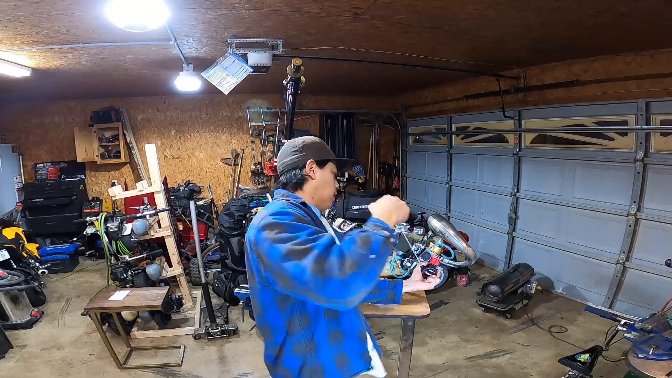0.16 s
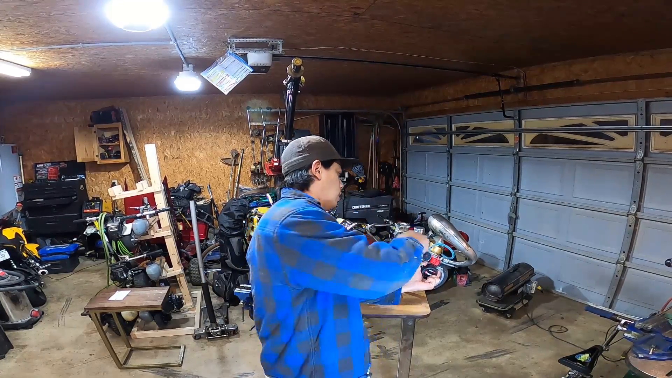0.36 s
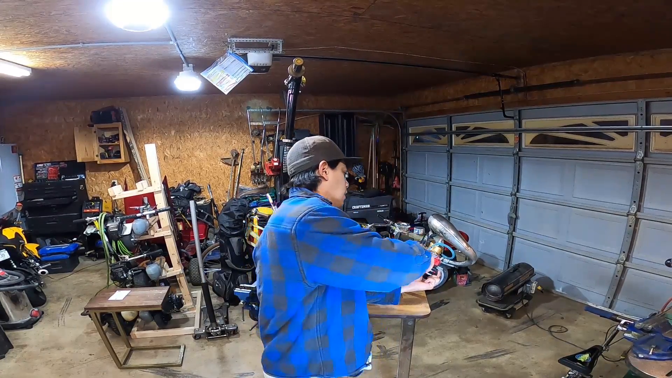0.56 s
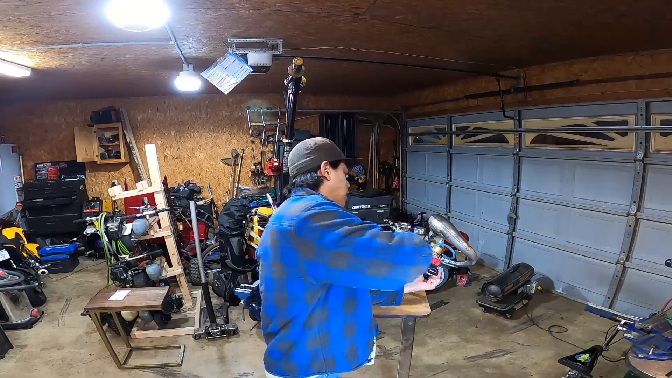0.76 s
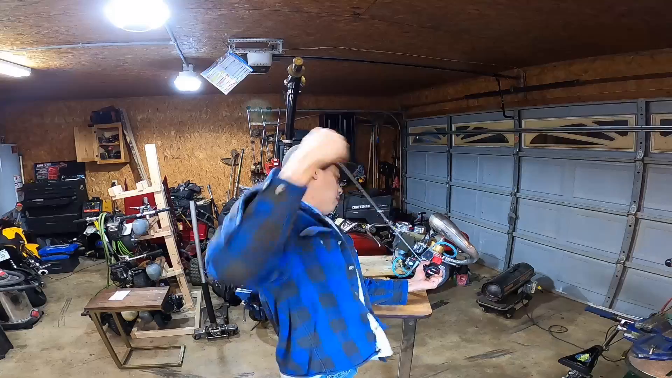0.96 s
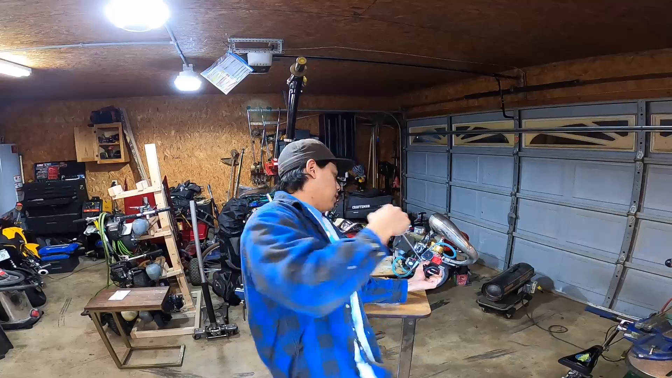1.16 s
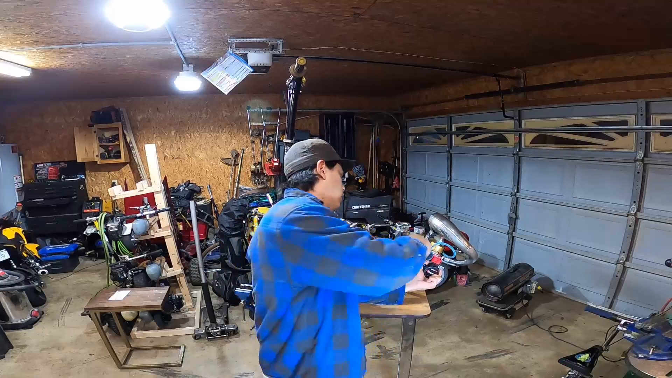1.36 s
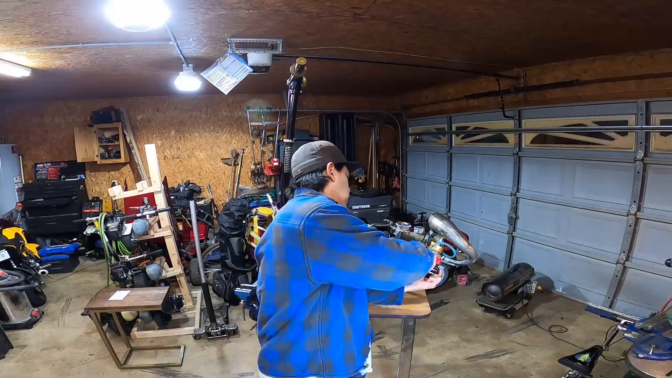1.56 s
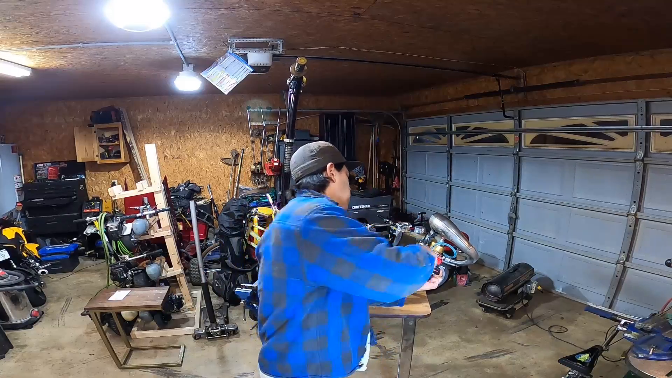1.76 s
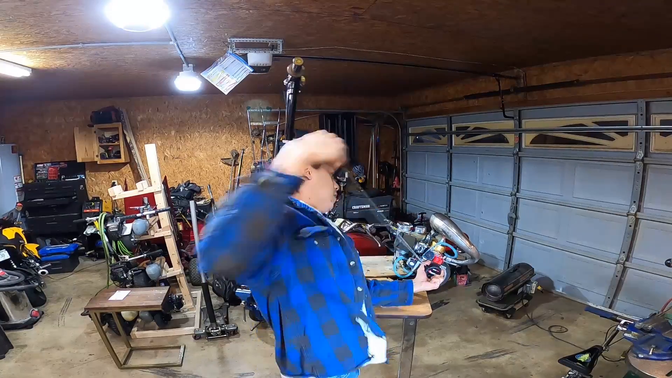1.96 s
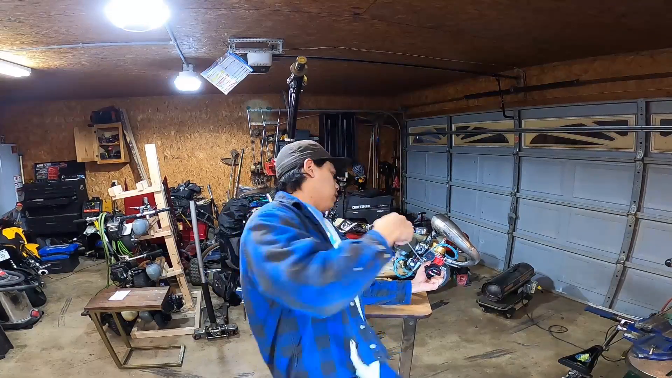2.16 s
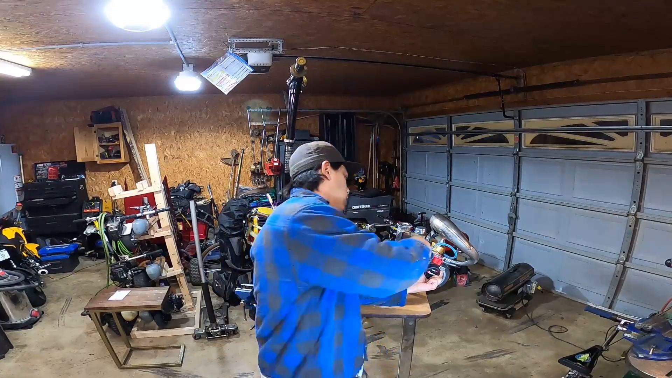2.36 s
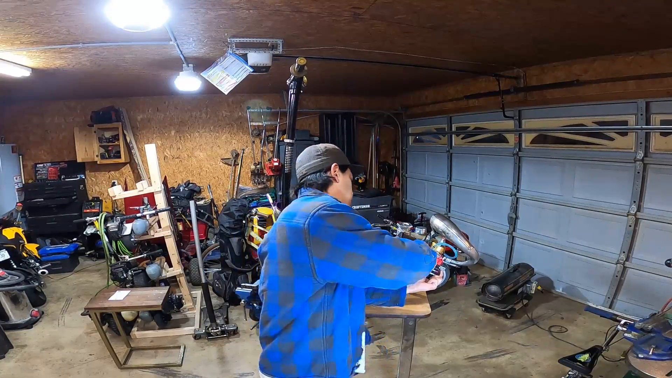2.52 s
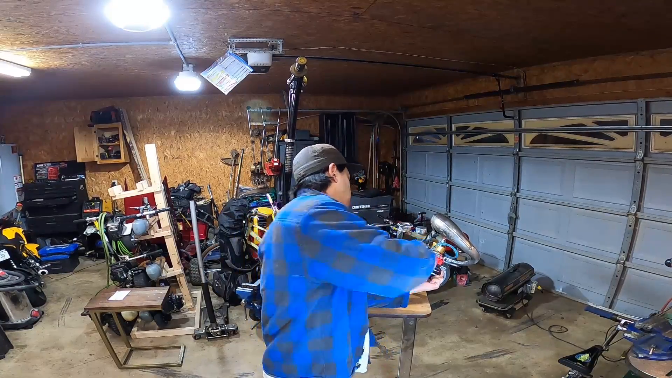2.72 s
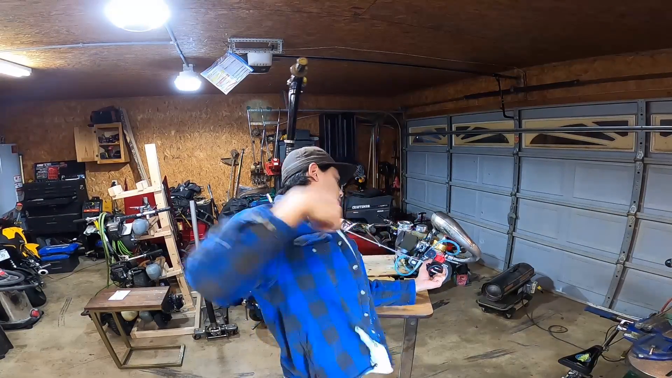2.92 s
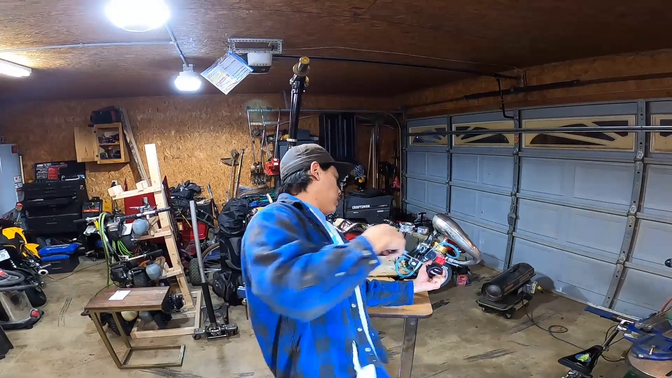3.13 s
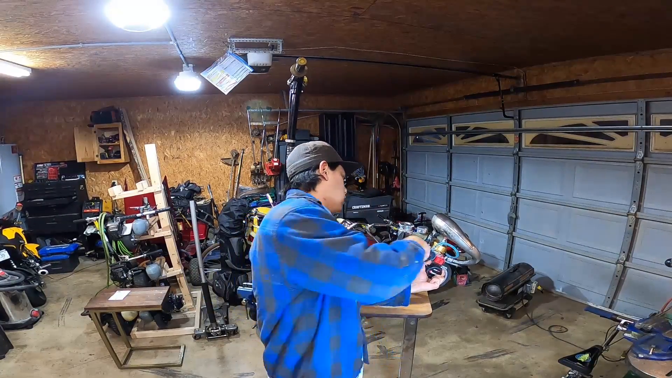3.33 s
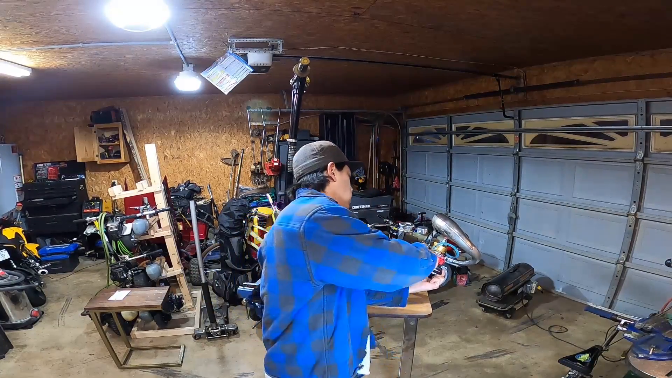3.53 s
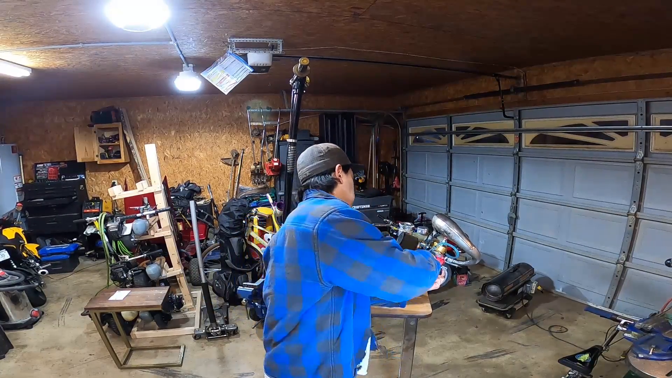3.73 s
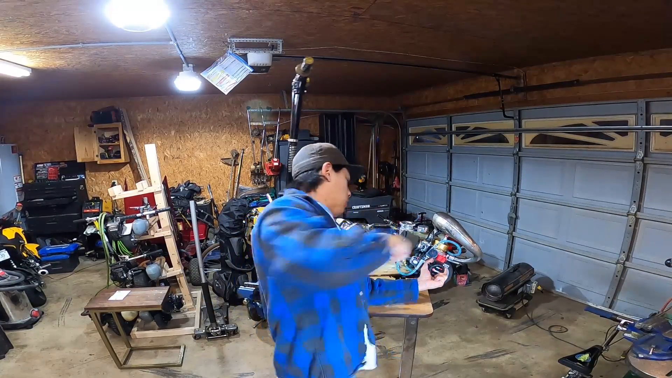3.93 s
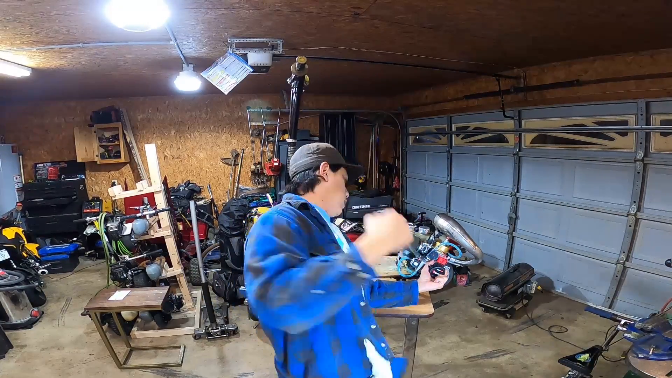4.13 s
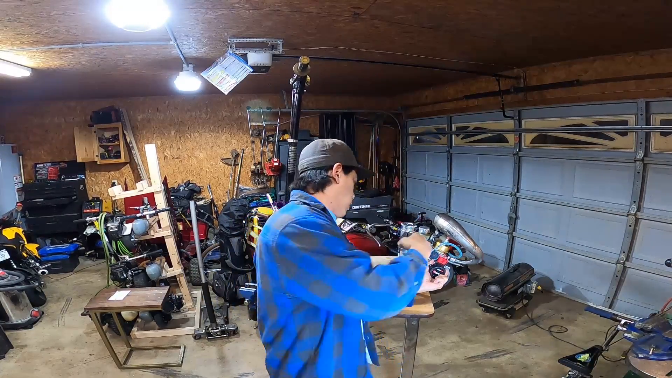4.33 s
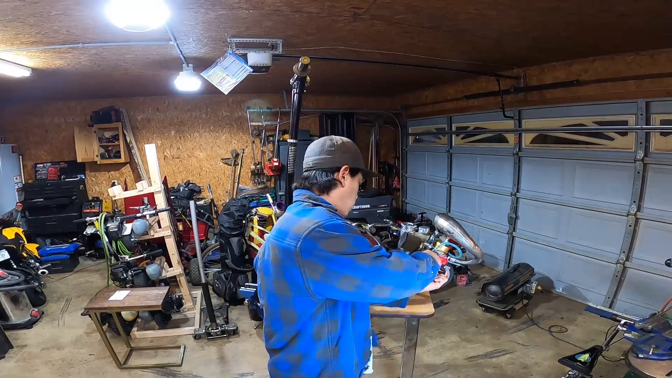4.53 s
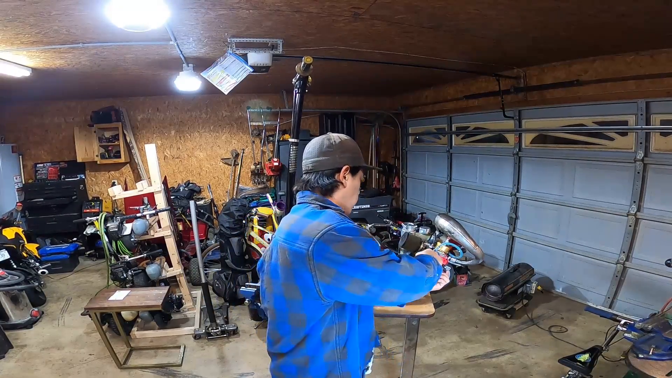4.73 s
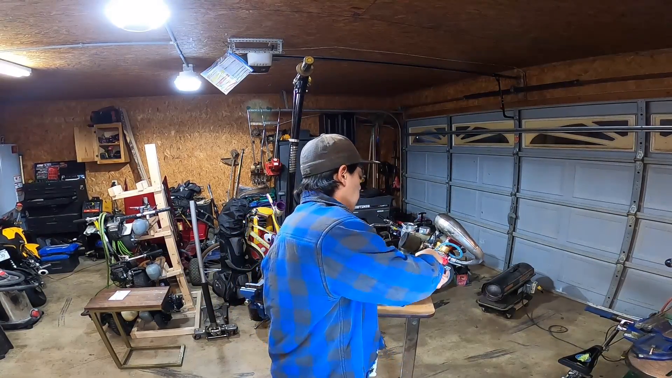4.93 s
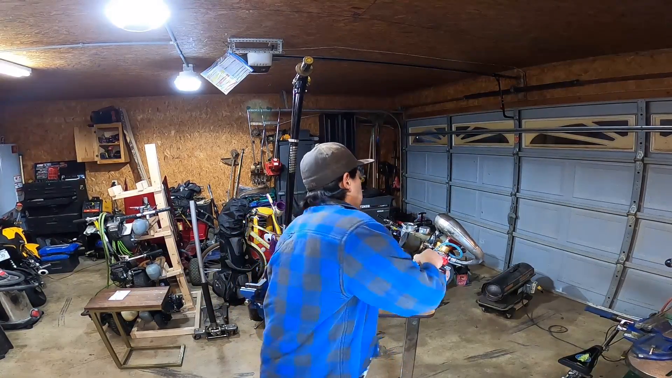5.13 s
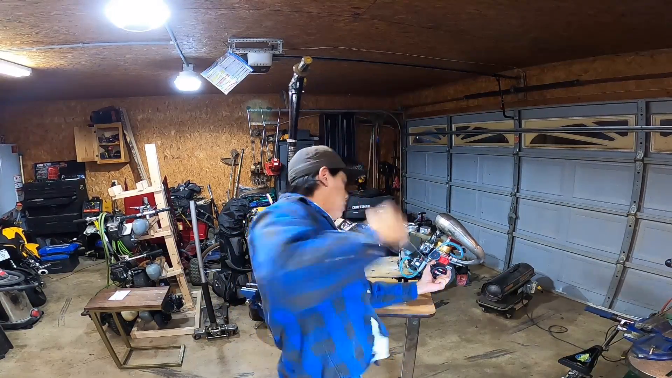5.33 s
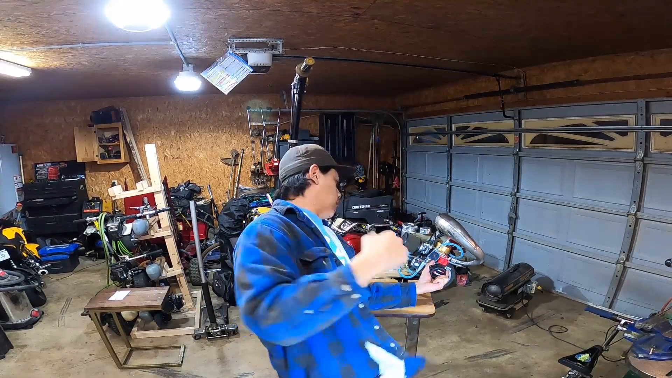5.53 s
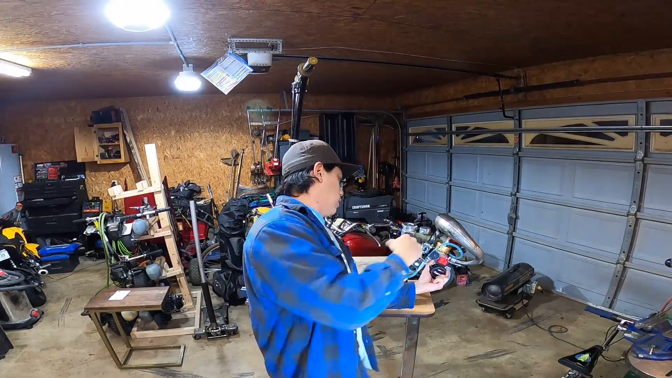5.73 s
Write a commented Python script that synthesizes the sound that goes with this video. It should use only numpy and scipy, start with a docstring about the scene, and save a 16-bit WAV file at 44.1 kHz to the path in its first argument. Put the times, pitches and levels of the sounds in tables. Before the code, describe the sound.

Six short starter pulls on a bench engine, heard from a few steps away in stereo with short garage reverberation. Zipping cord, rattling starter and low booming puffs come first, then pawls ticking as the cord rewinds, a soft thud and steel clack. The engine barely gurgles on the third pull, then barks and cracks on later pulls without staying alive. Quiet air and low rumble lie underneath.

```python
"""In a garage, a small two-stroke engine on a bench is pull-started six times.
Each pull zips the rope, clatters the starter and pumps puffs through a booming pipe. The third pull
sputters with a weak bark; on the last three, stronger barks, cracks and clutch tones mark the firings.
After each of the first four pulls the rope rewinds over ticking pawls; hard clacks fall between pulls.
Puffs and barks are compact pulses; the rest is shaped noise, tiny impacts and decaying tones."""
import sys
import numpy as np
from scipy import signal
from scipy.fft import rfft, irfft, next_fast_len
from scipy.io import wavfile
from scipy.ndimage import uniform_filter1d, map_coordinates

SR = 44100
rng = np.random.default_rng(int(sys.argv[2]) if len(sys.argv) > 2 else 0)


def digitize_waveform(pressure):
    """Quantize a signal to 16-bit integers and store it at the path in sys.argv[1].

    Rows of a 2-D input are taken as channels; values are limited to [-1, 1].
    """
    field = np.atleast_2d(pressure).T
    bounded = np.clip(field, -1, 1)
    quanta = np.round(bounded * 32767).astype(np.int16)
    wavfile.write(sys.argv[1], SR, quanta)


N = 254898


def amp(db):
    """Decibels to gain."""
    return 10 ** (np.asarray(db) / 20)


def unit(x):
    """Scale to rms 1."""
    return x / np.sqrt(np.mean(x ** 2) + 1e-20)


def along(points, hz):
    """Read (frequency, value) points on a log frequency axis."""
    f, v = np.transpose(points)
    return np.interp(np.log(hz + 1), np.log(f + 1), v)


def wobble(rate):
    """A smooth random curve with rate knots a second."""
    knots = rng.standard_normal(int(N * rate / SR) + 4)
    return map_coordinates(knots, [np.arange(N) * rate / SR])


def filtered(x, response):
    """Apply a complex response of frequency to x."""
    m = next_fast_len(N + SR)
    spectrum = rfft(x, m) * response(np.fft.rfftfreq(m, 1 / SR))
    return irfft(spectrum, m)[..., :N]


def shape(points):
    """Response that follows a spectrum of (frequency [Hz], level [dB])."""
    return lambda hz: amp(along(points, hz))


def resonances(modes):
    """Causal response of ringing modes (frequency [Hz], width [Hz], level [dB])."""
    return lambda f: sum(amp(db) * 1j * f * w / (c * c - f * f + 1j * f * w) for c, w, db in modes)


def lines(modes):
    """Response of narrow peaks (frequency [Hz], width [Hz], level [dB]), with no phase shift."""
    return lambda f: sum(amp(db) / (1 + (2 * (f - c) / w) ** 2) for c, w, db in modes)


def pulse(points, size=8192):
    """The most compact causal pulse with this spectrum (minimum phase), peak 1."""
    cepstrum = irfft(np.log(shape(points)(np.fft.rfftfreq(size, 1 / SR))))
    # fold the cepstrum onto positive time
    cepstrum[1:size // 2] *= 2
    cepstrum[size // 2 + 1:] = 0
    wave = irfft(np.exp(rfft(cepstrum)))
    return wave / np.abs(wave).max()


def strike(times, dbs, wave):
    """Place one copy of a wave at each time and level."""
    samples = np.clip(np.round(times * SR).astype(int), 0, N - 1)
    blows = np.bincount(samples, amp(dbs), N)
    return signal.fftconvolve(blows, wave)[:N]


def bursts(times, dbs, response, t60, attack):
    """Coloured noise that jumps at each contact and dies away; t60 and attack in seconds."""
    t = np.arange(SR // 2) / SR
    decay = amp(-60 * t / t60) * (1 - np.exp(-t / attack))
    noise = unit(filtered(rng.standard_normal(N), response))
    return strike(times, dbs, decay) * noise


def grains(per_second, points):
    """Tiny impacts of random time and size, rms 1."""
    impacts = rng.standard_normal(N) * (rng.random(N) < per_second / SR)
    return unit(signal.fftconvolve(impacts, pulse(points))[:N])


# how much the two sides share: (frequency [Hz], left-right likeness [0 to 1])
LIKENESS = [(60, .985), (130, .995), (250, .98), (500, .92), (1000, .6), (2000, .58), (4000, .25),
            (8000, .35), (14000, .35)]


def spread(pair):
    """Turn two unrelated signals into a diffuse stereo field: near-mono bass, wide treble."""
    turn = lambda hz: np.arccos(np.clip(along(LIKENESS, hz), 0, .995)) / 2
    mid, side = filtered(pair, lambda hz: np.array([np.cos(turn(hz)), np.sin(turn(hz))]))
    return np.array([mid + side, mid - side])


def rush(response):
    """Diffuse coloured noise of rms 1."""
    return unit(spread(filtered(rng.standard_normal((2, N)), response)))


def steadied(x, seconds):
    """Even out the slow swells of a narrow noise."""
    power = np.abs(uniform_filter1d(np.mean(x ** 2, axis=0), int(seconds * SR)))
    return x / np.sqrt(power + 1e-9)


# how long the walls ring: (frequency [Hz], time to fall 60 dB [s])
GARAGE_DECAY = [(100, 0.31), (260, 0.61), (700, 0.58), (2000, 0.58), (5000, 0.58), (9000, 0.35),
                (14000, .25)]


def garage(x, wet_db, size=256):
    """Add the walls' diffuse answer to a dry sound, with a fresh tail for each third of a second."""
    wet = np.zeros((2, N + SR))
    step = SR // 3
    hz, t, noise = signal.stft(rng.standard_normal((2, SR // 2)), SR, nperseg=size)
    decay = amp(-60 * t / along(GARAGE_DECAY, hz)[:, None]) * (1 - np.exp(-t / 0.0094))
    for start in range(0, N, step):
        # shuffled noise frames make the tail new each time
        tail = signal.istft(rng.permutation(noise, axis=2) * decay, SR, nperseg=size)[1]
        tail = tail / np.linalg.norm(tail[0])
        answer = signal.fftconvolve(x[None, start:start + step], tail, axes=1)
        wet[:, start:start + answer.shape[1]] += answer
    return x + amp(wet_db) * spread(wet[:, :N])


def swell(start, held, rise, fall_db_per_s):
    """Gain that rises up to its start, holds and dies away."""
    t = np.arange(N) / SR - start
    return np.clip(1 + t / rise, 0, 1) ** 2 * amp(-fall_db_per_s * np.maximum(t - held, 0))


def swells(rows, rise, fall_db_per_s):
    """One swell for each (time [s], held [s], level [dB]) row."""
    return sum(amp(db) * swell(s, held, rise, fall_db_per_s) for s, held, db in rows)


# still air: (frequency [Hz], relative level [dB])
AIR = [(12, -37.5), (20, -5), (54, -3.5), (124, -8.5), (183, -15), (217, -2.5), (235, -17), (278, -18.5),
       (1210, -38), (1780, -22), (1930, -26), (3360, -29), (9900, -67.5), (15000, -64)]
# electrical hum tones: (frequency [Hz], relative level [dB])
HUM_TONES = [(59.2, -61.5), (209.9, -68), (1723, -80), (1916, -77.5)]
# the rumble's course: (time [s], relative level [dB])
RUMBLE_LEVEL = [(0, -55), (3.2, -54), (4.55, -52), (5.0, -70.5), (5.78, -58)]
# the rumble's spectrum: (frequency [Hz], relative level [dB])
RUMBLE_COLOUR = [(20, -32), (40, -6.5), (58, 9), (80, -17), (200, -17.5), (3000, -120)]
# each port's own noise: (frequency [Hz], relative level [dB])
PORT_NOISE = [(20, -4), (70, -4.5), (200, -8.5), (1000, -29.0), (6000, -44.5), (15000, -59.5)]


def background():
    """Still air, wavering hum tones, a low rumble that comes and goes, and each port's own faint noise."""
    t = np.arange(N) / SR
    air = rush(shape(AIR))
    hum = sum(amp(db + wobble(3.1)) * np.sqrt(2) * np.sin(2 * np.pi * hz * t) for hz, db in HUM_TONES)
    rumble = amp(np.interp(t, *np.transpose(RUMBLE_LEVEL))) * rush(shape(RUMBLE_COLOUR))
    own = unit(filtered(rng.standard_normal((2, N)), shape(PORT_NOISE)))
    return amp(-57.5) * air + hum + amp(5.0) * rumble + amp(-56.5) * own


# modes of the ringing steel: (frequency [Hz], relative level [dB], time to fall 60 dB [s])
STEEL_MODES = [(4200, -4, .1), (5410, 0, .08), (5470, -6, .05), (6340, -6.5, .05), (9250, -8.5, .08),
               (9420, -10.5, .055), (11350, -18, .06), (11900, -20, .04), (12400, -21, .04),
               (14700, -35, .08)]


def steel_ring(times, dbs):
    """Each contact rings the steel's modes at slightly new strengths, with a fast flutter."""
    t = np.arange(SR // 4) / SR
    ring = np.zeros(N)
    for hz, db, t60 in STEEL_MODES:
        mode = amp(db - 60 * t / t60) * np.sin(2 * np.pi * hz * t) * (1 - np.exp(-t / .0004))
        ring += strike(times, dbs + 2 * rng.standard_normal(len(times)), mode)
    return ring * unit(amp(2.5 * wobble(500)))


# clacks between pulls, the handle knocking home or pawls catching:
# (time [s], relative clack level [dB], relative housing knock level [dB], pan, plus is left [dB])
CLACKS = [(0.7717, -26, -36, 1), (0.9342, -54, -49, 1), (0.9462, -67, -36, 6), (1.7854, -31, -33.5, 0.5),
          (1.9452, -60, -41, -0.5), (1.98, -39, -33, -2), (2.7693, -29.5, -35, 1.5),
          (3.9844, -44.5, -34.5, -5), (3.9966, -16, -38, -1), (5.3695, -41.5, -37, 0),
          (5.4004, -46, -36.5, -4)]
# click of steel: (frequency [Hz], relative level [dB])
CLICK_COLOUR = [(300, -49), (1500, 4.5), (3000, 6.5), (5500, 8), (7800, -5), (9300, -8.5), (10500, -16),
                (12300, -6), (14000, -30), (16000, -29)]
# knock of the starter housing: (frequency [Hz], relative level [dB])
KNOCK_COLOUR = [(100, -28), (350, 3), (550, -5.5), (1000, -3.5), (2200, -4), (3800, -9.5), (7000, -26),
                (14000, -51.5)]


def clacks():
    """Hard clacks ring steel and knock the starter housing."""
    s, db, knock_db, pan_db = np.transpose(CLACKS)
    snaps = bursts(s, db - 2, shape(CLICK_COLOUR), t60=0.04, attack=.002)
    # a second, weaker ring follows 3 ms later
    ring = steel_ring(s, db - 14) + steel_ring(s + .003, db - 18.5)
    knocks = bursts(s, knock_db + 1.5, shape(KNOCK_COLOUR), t60=0.056, attack=0.0022)
    pan = np.interp(np.arange(N) / SR, s, pan_db)
    return garage(snaps + ring + knocks, wet_db=-2.5) * amp([pan / 2, -pan / 2])


# the rope drawn back: (start [s], handle lands [s], tick rate at the start, midway and at the end [1/s],
# relative tick level [dB], hardest ring at [s], relative levels of ring, rope and landing [dB])
REWINDS = [(0.247, 0.629, 17, 33.73, 12.4, -30, 0.37, -42, -48.5, -39.5),
           (1.2, 1.638, 26.3, 37.2, 10.9, -30, 1.405, -40.5, -49.5, -35.5),
           (2.228, 2.606, 40, 35.03, 21.7, -29.5, 2.27, -39, -48.5, -33),
           (3.212, 3.641, 38.7, 30.78, 15.7, -31, 3.23, -44, -50.5, -38)]
RELEASE_DB, RELEASE_S = 5.5, 0.049  # the first ticks, as the pawls let go, are harder
TICK_FADE_DB_PER_S = 3.5  # the spring slackens
TICK_SCATTER_DB, RING_SCATTER_DB = 2, 4  # chance from tick to tick
RING_DIP_DB, RING_SPAN_S = 11.5, 0.05  # away from their hardest bounce the pawls ring less


def ticks():
    """Times [s], tick levels and ring levels [dB] of the pawls' skips, along a curve through three rates."""
    rows, progress = [], np.linspace(0, 1, 200)
    for start, end, first, midway, last, db, ring_s, ring_db, *_ in REWINDS:
        length = end - start
        curve = np.polyfit([0, .5, 1], [first, midway, last], 2)
        rate = np.maximum(np.polyval(curve, progress), 1)
        # a tick falls wherever the summed rate passes a whole number
        skips = (np.cumsum(rate) - rate[0]) * length * progress[1]
        age = np.interp(np.arange(np.ceil(skips[-1])), skips, progress) * length
        hard, bright = rng.standard_normal(size=(64, 2))[:len(age)].T
        release = RELEASE_DB * np.exp(-age / RELEASE_S)
        force = release - TICK_FADE_DB_PER_S * age
        dip = RING_DIP_DB * (1 - np.exp(-((start + age - ring_s) / RING_SPAN_S) ** 2))
        tick_db = db + force + TICK_SCATTER_DB * hard
        rows += zip(start + age, tick_db, ring_db - dip + release + RING_SCATTER_DB * bright)
    return np.transpose(rows)


# grit of sliding rope and starter drive: (frequency [Hz], relative level [dB])
CLATTER_COLOUR = [(200, -42.5), (700, -8.5), (850, -3), (1200, -1), (1700, -2.5), (2300, -5), (3300, -15.5),
                  (5000, -15.5), (7000, -18.5), (9300, -23), (10500, -33.5), (13000, -40), (16000, -78)]
# handle landing: (frequency [Hz], relative level [dB])
THUD_COLOUR = [(100, -20), (400, -5), (700, 0), (1300, -6), (3000, -14), (16000, -60)]
# sleeve cloth: (frequency [Hz], relative level [dB])
SLEEVE_COLOUR = [(60, -18), (150, -1), (220, 3), (350, -8.5), (500, -5.5), (750, -17.5), (1200, -22),
                 (3000, -38), (8000, -61)]
SLEEVE_DB, SLEEVE_S = -53, 0.23  # base level and hold as the arm settles


def rewind():
    """Steel pawls tick over the cup and the rope slides back, until the handle lands and the sleeve settles."""
    s, db, ring_db = ticks()
    clicks = bursts(s, db - 5.5, shape(CLICK_COLOUR), t60=0.031, attack=0.00078)
    clicks = clicks + steel_ring(s, ring_db + 1.5)
    start, end, *_, rope_db, landing_db = np.transpose(REWINDS)
    slide = swells(zip(start, end - start, rope_db - 7), rise=.05, fall_db_per_s=249)
    slide = slide * grains(900, CLATTER_COLOUR)
    landings = bursts(end, landing_db - 4.5, shape(THUD_COLOUR), t60=.11, attack=0.0011)
    taps = bursts(end, landing_db - 3.5, shape(CLICK_COLOUR), t60=0.03, attack=0.00081)
    settling = swells([(s, SLEEVE_S, SLEEVE_DB) for s in end], rise=.05, fall_db_per_s=89.5)
    sleeve = settling * rush(shape(SLEEVE_COLOUR)) * amp(2.5 * wobble(18))
    return garage(clicks + taps, wet_db=-4.0) + garage(landings + slide, wet_db=-0.5) + sleeve


# pulls: (yank [s], spin length [s], crank speed [turns/s], pipe heat [0 cold to 1 firing],
# relative levels of boom, gas, clatter, rope and first puff [dB], slack before the yank [s], slack [dB])
PULLS = [ (0.033, 0.098, 30, 0.059, -20, -20.5, -33.5, -26.5, -6.5, 0.031, -21),
         (1.005, 0.13, 30.5, 0.15, -20, -20.5, -31.5, -25.5, -6.5, 0.063, -17),
         (2.027, 0.13, 44.5, 0.18, -24, -22.5, -30.5, -25.5, -7.5, 0.079, -17.5),
         (2.972, .18, 41, 0.56, -21.5, -22, -31.5, -25, -7, 0.044, -18),
         (4.083, 0.47, 45, 0.91, -19.5, -21, -30.5, -27.5, -8.5, .06, -10.5),
         (5.446, 0.29, 50, .75, -21.5, -24, -30, -25, -10, 0.05, -14), ]
ATTACK_S, SLACK_RISE_S = 0.011, 0.0067  # the rope comes taut; the slack starts to run
SAG_DB_PER_S = 5.5  # the level sags while the crank spins


def spin(dbs, law, slack_db):
    """A layer's gain over all pulls: slack runs out, the yank kicks, the crank spins and runs down."""
    kick_db, kick_s, lag, fall = law
    t, gain = np.arange(N) / SR, np.zeros(N)
    for (s, length, *_, slack_s, lead_db), db in zip(PULLS, dbs):
        age = np.maximum(t - s, 0)
        kick = amp(kick_db * np.exp(-age / kick_s) - SAG_DB_PER_S * age)
        slack = amp(lead_db + slack_db) * swell(s - slack_s, slack_s, SLACK_RISE_S, fall)
        gain += amp(db) * np.maximum(slack, kick * swell(s, length + lag, ATTACK_S, fall))
    return gain


# zip of rope through its eyelet, also used for the cracks: (frequency [Hz], relative level [dB])
ZIP_COLOUR = [(500, -58), (1400, -14), (2100, -0.5), (2700, -1.5), (3100, -2), (3600, -5), (4200, -7),
              (5500, -11.5), (7000, -20), (9300, -29.5), (10500, -32.5), (13000, -40), (16000, -53.5)]
# creaks of the held rope: (time [s], held [s], relative level [dB])
CREAKS = [(3.8, 0.18, -63.5), (5.08, 0.086, -70.5), (5.25, 0.08, -67.5)]
# creaking fibres: (frequency [Hz], relative level [dB])
CREAK_COLOUR = [(100, -22), (350, -6), (1000, -2.5), (2200, 1.5), (3800, -1), (7000, -13), (14000, -36.5)]
ROPE_S, ROPE_FALL_DB_PER_S = 0.055, 380  # the arm's stroke, and the stopping of its zip
INTAKE_DB = -3  # intake hiss of a hot engine, against the rope
# how a layer follows the spin: (kick at the yank [dB], kick length [s], lag [s], run-down [dB/s])
CLATTER_LAW = (2.5, 0.02, 0.0036, 292)


def rope():
    """The rope zips strand by strand and creaks while held; a hot engine's intake hisses on after it."""
    _, _, _, heat, _, _, _, rope_db, *_ = np.transpose(PULLS)
    arm_strokes = [(s, ROPE_S, db) for (s, *_), db in zip(PULLS, rope_db)]
    zips = swells(arm_strokes, 1.6 * ATTACK_S, ROPE_FALL_DB_PER_S)
    intake = spin(rope_db + INTAKE_DB - 12 * (1 - heat), CLATTER_LAW, slack_db=8.5)
    gain = np.maximum(zips, intake)
    strands = gain * unit(grains(600, ZIP_COLOUR) * amp(1.4 * wobble(90)))
    rasp = gain * unit(rush(shape(ZIP_COLOUR)) * amp(4.4 * wobble(110)))
    creaks = swells(CREAKS, rise=0.042, fall_db_per_s=201) * grains(160, CREAK_COLOUR)
    return garage(amp(-5) * strands, wet_db=2.5) + amp(-0.5) * rasp + garage(creaks, wet_db=-2.5)


def crank():
    """Per sample: a surge once a turn, between -1 and 1, and the heat of the pipe."""
    s, _, speed, heat, *_ = np.transpose(PULLS)
    t = np.arange(N) / SR
    # each pull takes over 0.2 s ahead of its yank
    pull = np.maximum(np.searchsorted(s - .2, t) - 1, 0)
    turns = (t - s[pull]) * speed[pull] + .08 * wobble(20)
    return np.cos(2 * np.pi * turns), np.clip(heat[pull], 0, 1)


# the pipe's boom: (frequency [Hz], relative level [dB])
BOOM_COLOUR = [(20, -21.5), (45, -21), (65, -3), (85, -14), (115, -13), (150, -4.5), (178, -18), (196, 8),
               (218, -17), (240, 1.5), (280, -12), (340, -10), (420, -22.5), (1500, -120)]
# gas in a cold pipe: (frequency [Hz], relative level [dB])
COLD_GAS = [(100, -70), (340, -21), (400, 2), (430, 2.5), (470, -15.5), (520, -7.5), (600, -17.5),
            (700, -14), (830, -24.5), (1300, -33.5), (5000, -120)]
# gas in a hot pipe: (frequency [Hz], relative level [dB])
HOT_GAS = [(100, -70), (350, -9.5), (450, -3.5), (490, -2), (535, 2), (570, -7), (605, -5), (670, -13.5),
           (728, -4.5), (800, -21.5), (1300, -26.5), (5000, -120)]
# how boom and gas follow the spin: (kick at the yank [dB], kick length [s], lag [s], run-down [dB/s])
BOOM_LAW, GAS_LAW = (5, 0.28, 0, 124), (0, -1, 0.0282, 105.5)  # the gas has no kick


def cranking():
    """The spinning crank booms the pipe; gas in the ports and the clattering drive surge with each turn."""
    _, _, _, _, boom_db, gas_db, clatter_db, *_ = np.transpose(PULLS)
    surge, heat = crank()
    boom = spin(boom_db, BOOM_LAW, slack_db=-4.5) * steadied(rush(shape(BOOM_COLOUR)), seconds=0.0373)
    # hot gas carries sound faster and lifts the pipe's resonances
    flow = np.sqrt(1 - heat) * rush(shape(COLD_GAS)) + np.sqrt(heat) * rush(shape(HOT_GAS))
    surging_flow = unit(amp(0.83 * surge) * steadied(flow, seconds=0.038))
    gas = spin(gas_db, GAS_LAW, slack_db=-1.5) * surging_flow
    surging_grit = unit(grains(450, CLATTER_COLOUR) * amp(2.6 * surge))
    rattle = spin(clatter_db, CLATTER_LAW, slack_db=3.5) * surging_grit
    return amp(-4) * boom + amp(-2.5) * gas + amp(-3.5) * garage(rattle, wet_db=3.5)


# tones of the clutch drum: (frequency [Hz], relative level [dB])
DRUM_TONES = [(2762, -19), (3074, -12), (3262, 0), (3677, -6.5), (4296, -20), (4592, -14)]
# squeals of rubbing metal: (time [s], held [s], relative level [dB])
SQUEALS = [(2.154, .005, -36), (3.15, 0.03, -40), (4.468, .13, -39)]
# peaks of the squeal: (frequency [Hz], width [Hz], relative level [dB])
SQUEAL_PEAKS = [(7430, 37, 9), (7671, 38.7, -25), (14300, 160, -27)]
DRUM_T60, DRUM_RISE_S = 0.44, 0.0025  # the drum's ring in the room, in seconds


def clutch():
    """Each ignition rings the clutch drum like a small bell; rubbing metal squeals."""
    t = np.arange(N) / SR

    def tone(hz):
        """A drum tone whose phase and strength waver."""
        phase = 2 * np.pi * (hz * t + rng.random()) + 0.75 * wobble(22)
        return amp(1.6 * wobble(25)) * np.sin(phase)

    # two separate mixes of the tones feed the stereo field
    drum = np.array([sum(amp(db) * tone(hz) for hz, db in DRUM_TONES) for _ in range(2)])
    power = sum((amp(db) * swell(s + DRUM_RISE_S, 0, DRUM_RISE_S, 60 / DRUM_T60)) ** 2
                for s, *_, db in FIRINGS)
    bell = np.sqrt(power) * unit(spread(drum))
    metal = steadied(rush(lines(SQUEAL_PEAKS)), seconds=0.038)
    squeal = swells(SQUEALS, rise=.008, fall_db_per_s=168) * metal
    return amp(4.5) * bell + amp(0.5) * squeal


# a misfire gurgling in the pipe: (time [s], relative level [dB])
SPUTTERS = [(2.153, -23), (2.177, -27), (2.21, -35)]
# the gurgle: (frequency [Hz], relative level [dB])
GURGLE_COLOUR = [(250, -44), (560, -3.5), (780, -3), (1000, 1), (1250, -14), (2000, -17), (6000, -74.5)]


def misfire():
    """Fuel that burns late sputters through the pipe."""
    s, db = np.transpose(SPUTTERS)
    return garage(bursts(s, db, shape(GURGLE_COLOUR), t60=0.167, attack=0.0024), wet_db=-7.0)


PUFF_LAG_S = 0.002956  # from the yank to the first puff
STROKE_FADE_DB, STROKE_FADE_TURNS = 11.5, 3.15  # the puffs weaken once the rope is out


def strokes():
    """Times [s] and levels [dB] of the piston's puffs: about one a turn, fading from the yank on."""
    rows = []
    for s, length, speed, *_, first_db, _, _ in PULLS:
        chance = rng.standard_normal(size=(64, 2))
        age = np.arange(0, length, 1 / speed)[:len(chance)]
        late, loud = chance[:len(age)].T
        fade = STROKE_FADE_DB * (1 - np.exp(-(age * speed / STROKE_FADE_TURNS) ** 2))
        # timing strays further as the spin goes on
        rows += zip(s + PUFF_LAG_S + age + 0.0152 * age * late, first_db - fade + 0.9 * loud)
    return np.transpose(rows)


# ignitions: (time [s], relative levels of bark, crack, clutch chirp and clutch ring [dB])
FIRINGS = [(2.155, -16.5, -43, -49, -63), (3.047, -9.5, -27, -43, -34), (3.06, -8.5, -41, -43, -32),
           (4.101, -7, -12.5, -15, -24), (4.16, -7, -19.5, -30, -40), (4.209, -10.5, -21, -29, -32),
           (4.285, -8.5, -23, -21, -34), (4.347, -8, -21, -20, -46), (4.413, -8, -20.5, -35, -35),
           (4.488, -9.5, -22.5, -30, -35), (4.585, -23, -33, -42.5, -40.5),
           (5.465, -7.5, -15.5, -17.5, -27), (5.543, -6.5, -18.5, -17.5, -33), (5.58, -10, -26, -33, -24),
           (5.641, -7.5, -18, -23.5, -45), (5.68, -13.5, -26, -36, -27.5)]
# puff of pumped air: (frequency [Hz], relative level [dB])
PUFF_COLOUR = [(25, -43), (65, -24.5), (105, -26.5), (150, -12), (215, -3), (300, -7.5), (400, -11.5),
               (700, -36.5), (1500, -50.5), (4000, -91.5)]
# bark of an ignition: (frequency [Hz], relative level [dB])
BARK_COLOUR = [(40, -19), (120, -28.5), (220, 0), (380, -6.5), (520, 4.5), (700, -3.5), (830, -25.5),
               (1300, -14), (2500, -45.5), (8000, -77)]
# peaks of the jerked clutch: (frequency [Hz], width [Hz], relative level [dB])
CHIRP_PEAKS = [(4610, 270, 2), (9100, 710, -18.5)]
# standing waves of the room, and the pipe's own ring near 400-426 Hz: (frequency [Hz], width [Hz], relative
# level [dB])
ROOM_AND_PIPE_MODES = [(63, 5.5, -0.5), (156.5, 7.1, -6.5), (193.3, 8.4, 9), (233.3, 9.6, -6.5), (279, 9, -13),
                       (308, 10, -24.5), (400, 4, -18), (426, 5.9, -7.5)]


def piston():
    """Strokes push puffs out of the pipe; an ignition barks, cracks and jerks the clutch into a chirp."""
    puffs = strike(*strokes(), pulse(PUFF_COLOUR))
    s, db, crack_db, chirp_db, _ = np.transpose(FIRINGS)
    barks = strike(s, db + 0.5, pulse(BARK_COLOUR))
    cracks = bursts(s, crack_db - 4, shape(ZIP_COLOUR), t60=0.052, attack=0.00039)
    chirps = bursts(s + 0.001, chirp_db + 0.5, lines(CHIRP_PEAKS), t60=0.084, attack=0.0053)
    # the low pulses leave the room's standing waves and the pipe ringing
    standing = filtered(puffs + barks, resonances(ROOM_AND_PIPE_MODES))
    snap = garage(cracks + chirps, wet_db=-3)
    return garage(puffs, wet_db=-4.5) + garage(barks, wet_db=-2) + snap + standing


# phase between the ports: (frequency [Hz], lead of the left [rad])
PORT_LEAD = [(20, 0.79), (130, -0.2), (250, -0.091), (500, -0.035), (1500, -0.48), (3400, -0.28),
             (5000, -1.84), (6200, 0.28), (15000, 0)]
# level between the ports: (frequency [Hz], left minus right [dB])
PORT_LEAN = [(60, 0), (130, 0.0), (290, 0), (640, 1.5), (1410, 1.5), (3100, 2), (6820, 0), (15000, -3.5)]


def scene():
    """Two microphone ports take the engine with slightly different phase and level, over the background."""
    engine = piston() + misfire() + cranking() + rope() + clutch() + rewind() + clacks()
    sides = np.array([[.5], [-.5]])
    ports = lambda hz: amp(sides * along(PORT_LEAN, hz)) * np.exp(1j * sides * along(PORT_LEAD, hz))
    return filtered(engine, ports) + background()


TOP_HZ = 15700


def record(dry):
    """Keep nothing at or above the band limit."""
    return filtered(dry, lambda hz: hz < TOP_HZ)


dry = scene()
out = record(dry)
digitize_waveform(out)
```